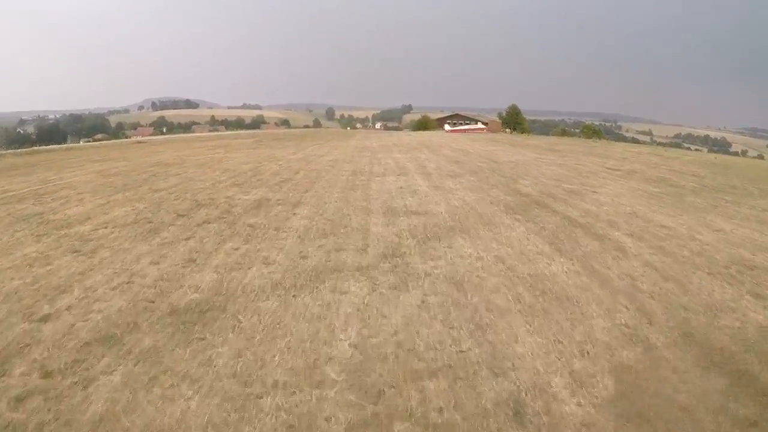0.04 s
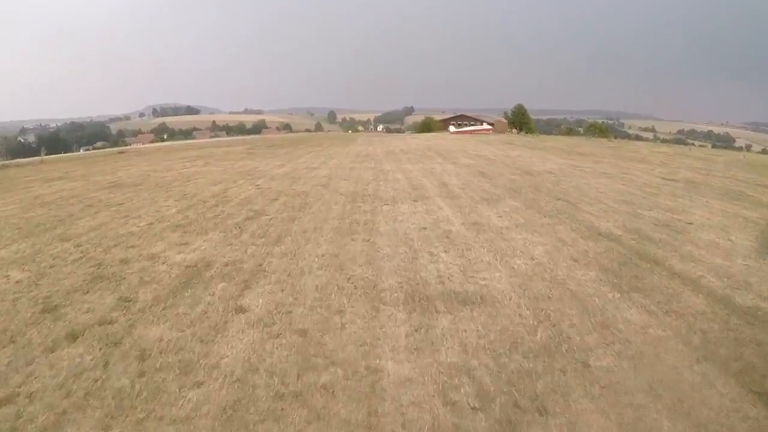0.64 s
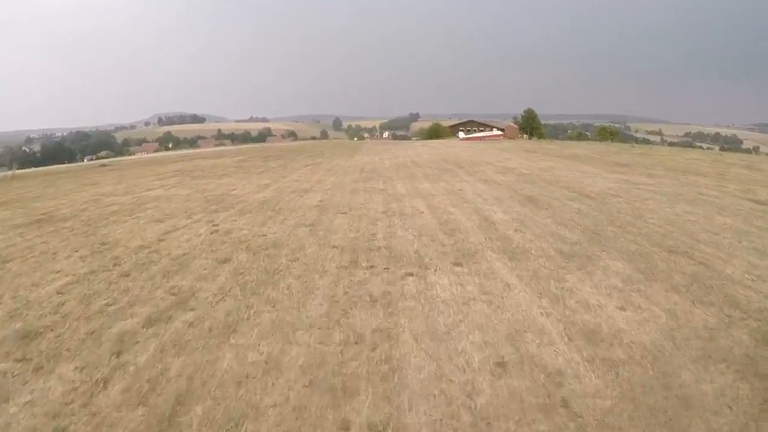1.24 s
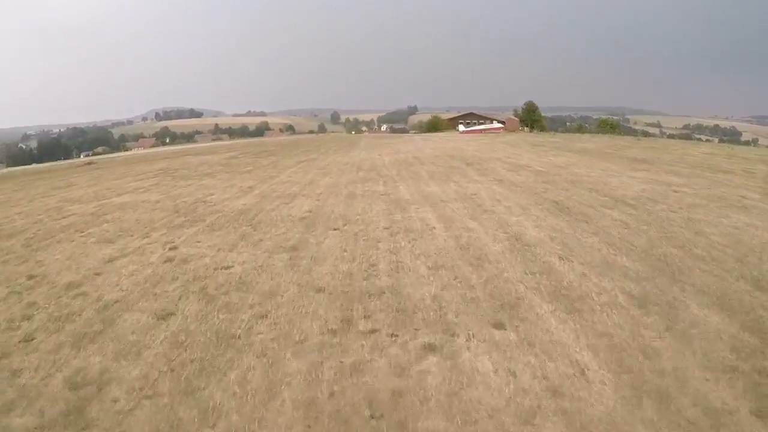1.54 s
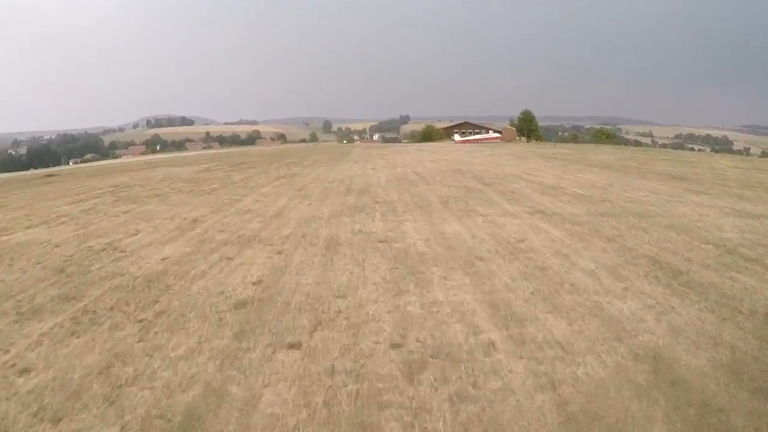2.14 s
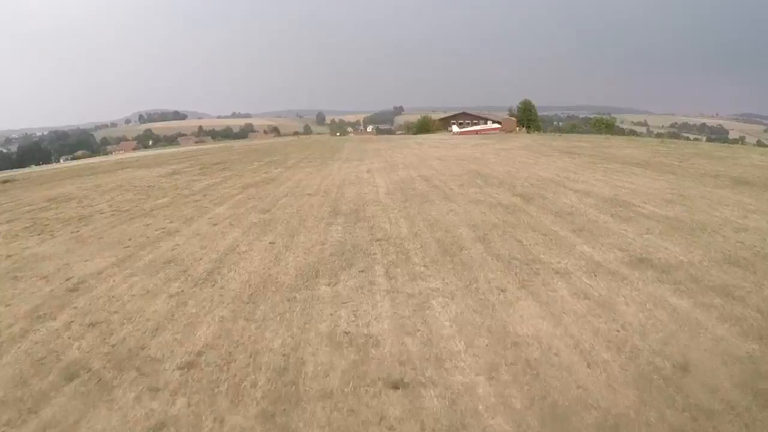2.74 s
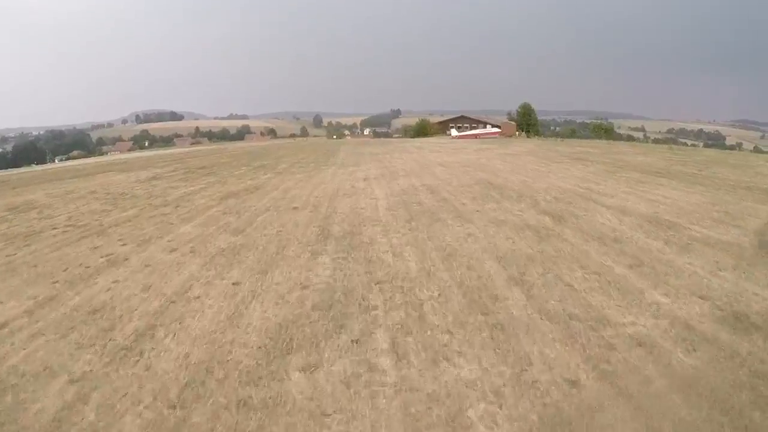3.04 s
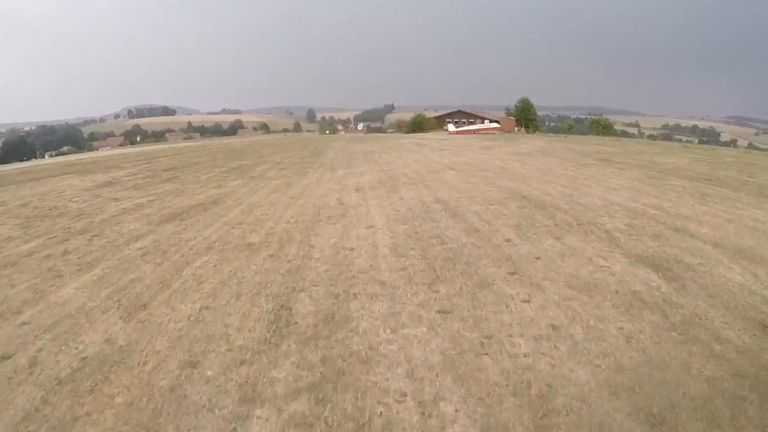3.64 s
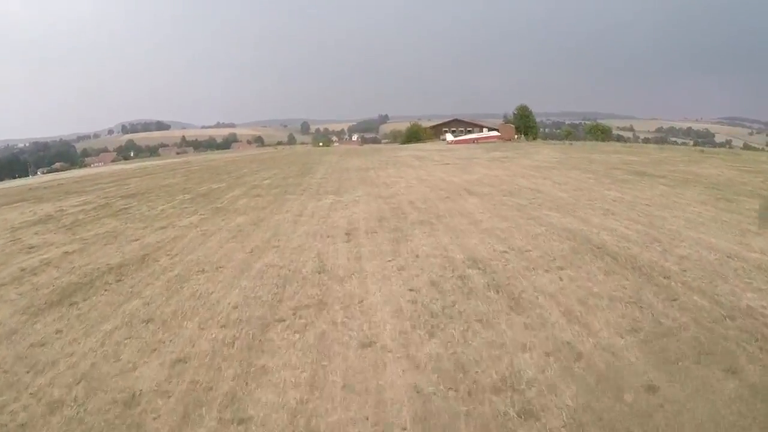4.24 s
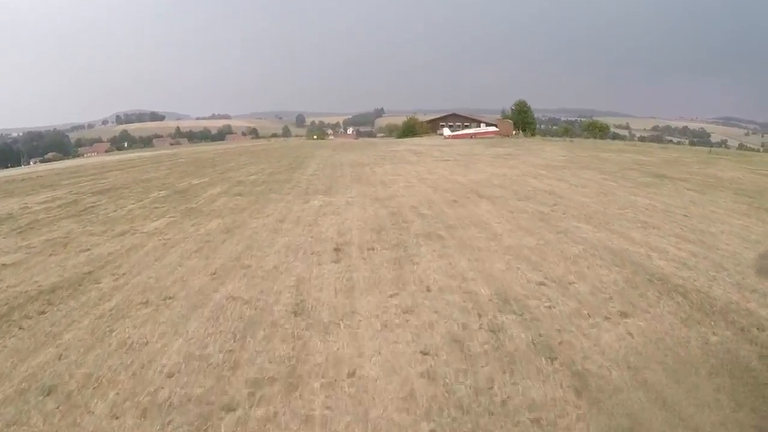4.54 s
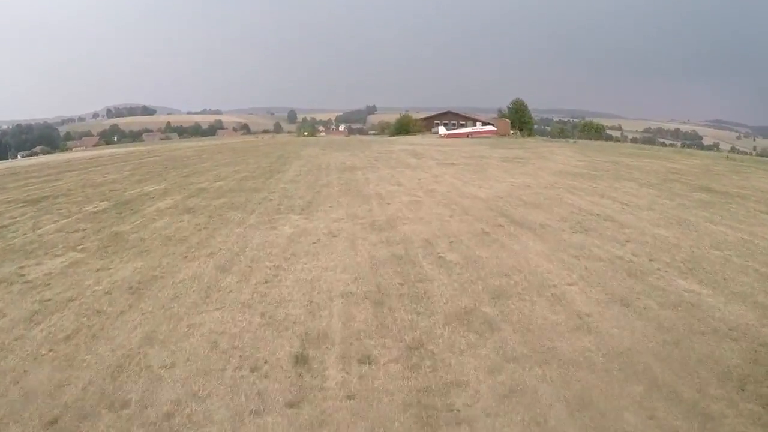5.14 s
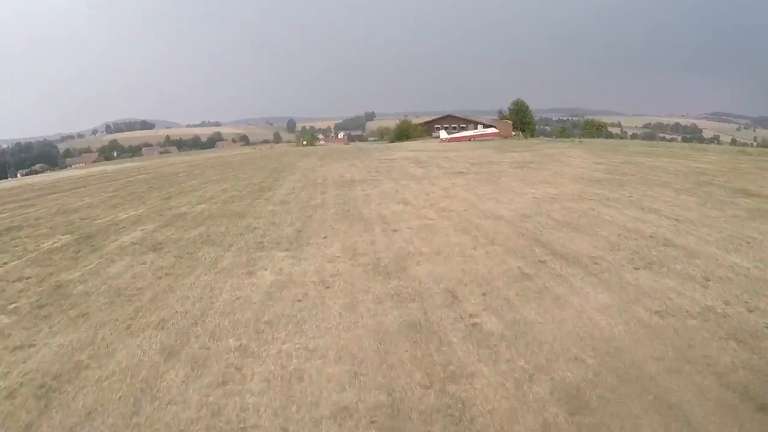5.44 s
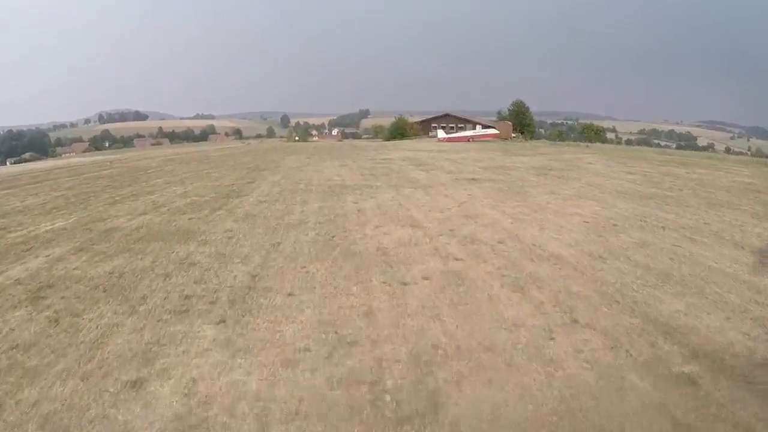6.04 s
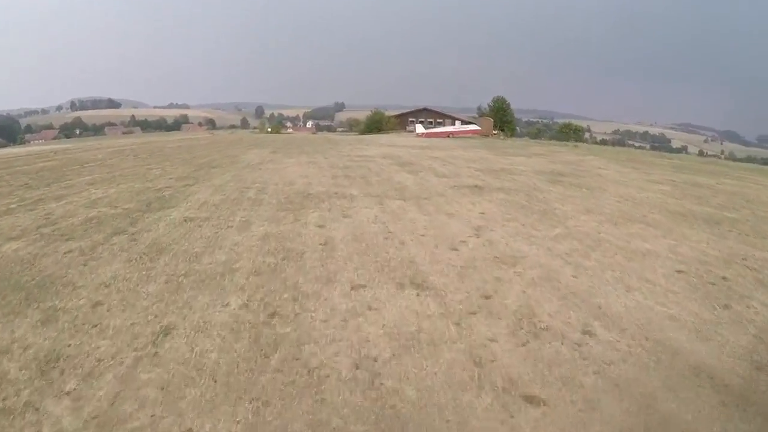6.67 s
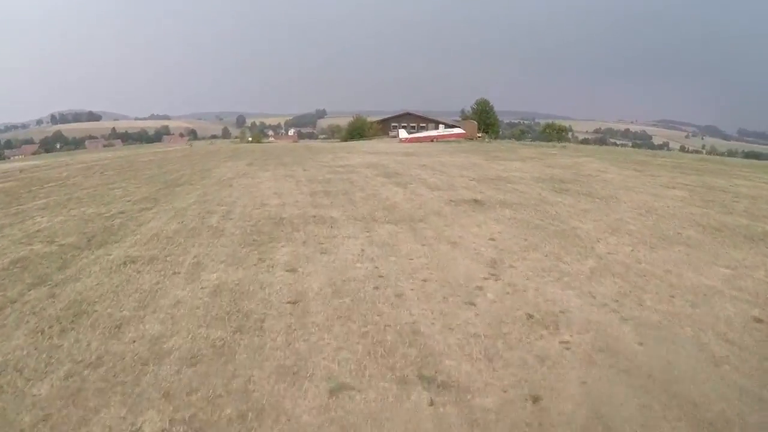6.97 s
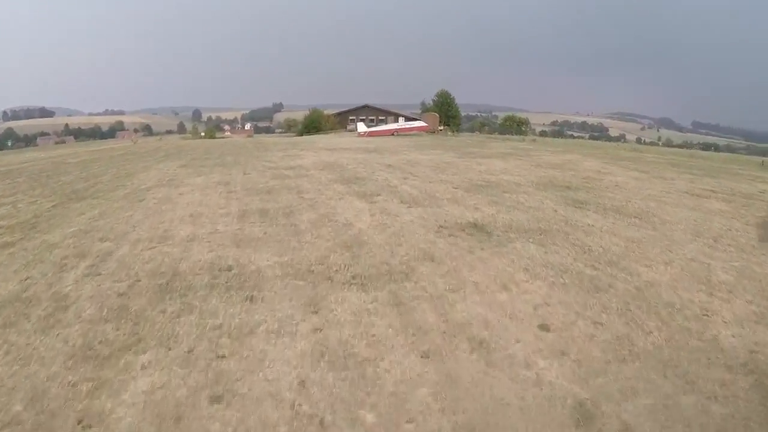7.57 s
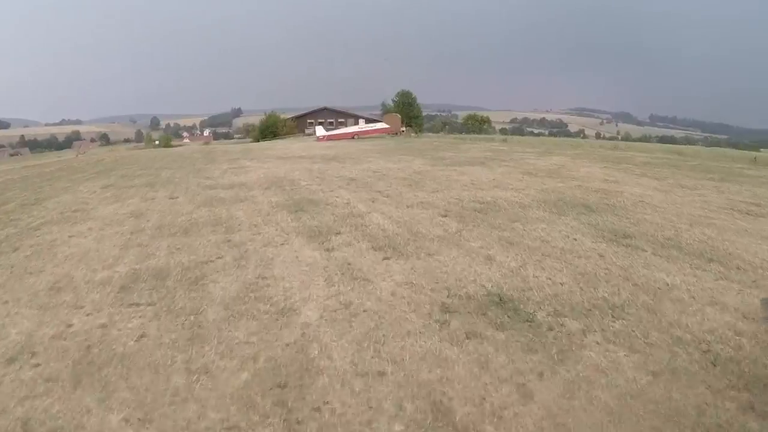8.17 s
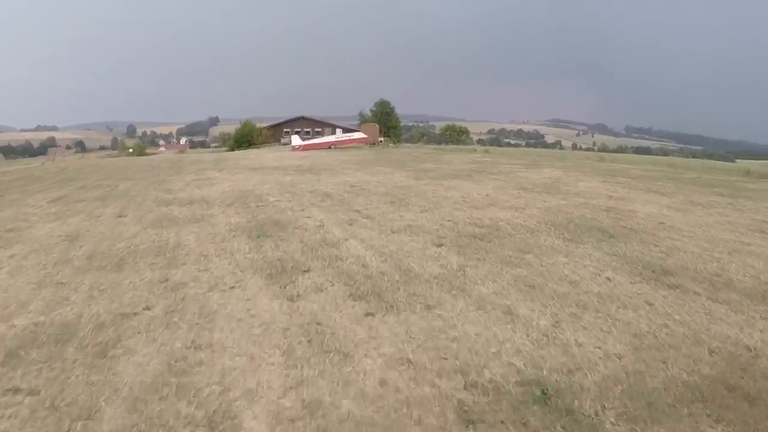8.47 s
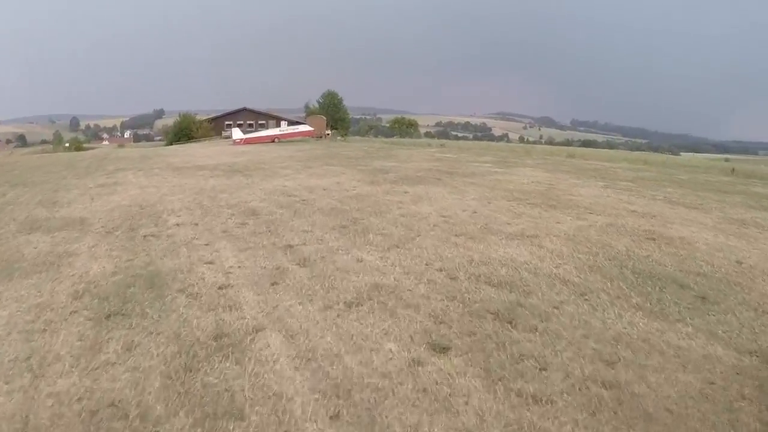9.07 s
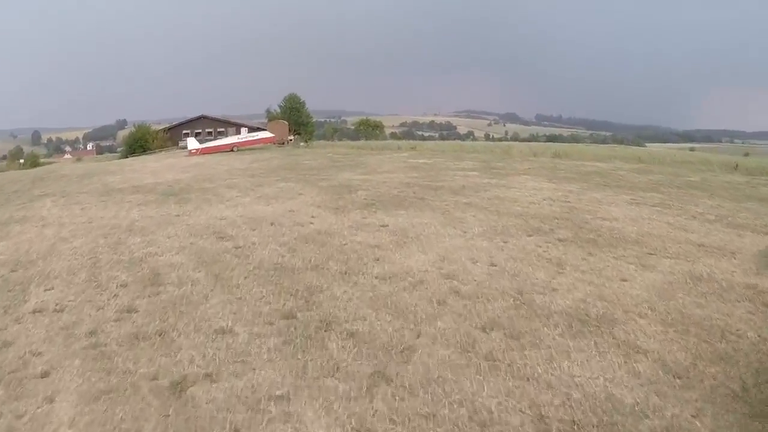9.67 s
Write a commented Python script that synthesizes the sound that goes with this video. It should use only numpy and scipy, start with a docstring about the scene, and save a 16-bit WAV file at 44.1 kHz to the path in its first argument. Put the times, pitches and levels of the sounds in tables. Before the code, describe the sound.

A light aircraft taxis over a bumpy grass strip, heard in the open air from a microphone mounted on its outside. From the start a deep, wavering rumble and boom of the airframe dominates. Beneath it the engine idles evenly with exhaust chuffs and fine, high valve ticks, and the tyres rustle through dry grass. A loose fitting knocks irregularly on the bumps, with short squeaks near 0.7 and 1.6 seconds, a cluster of knocks from 2 to 2.5 seconds and a sharp one near 3.5. The busiest run of knocking comes from 4.3 to 5.4 seconds, with one tiny bright tick of grit near 5.1. The rumble dips briefly around 6.7 seconds, with a faint squeak. A few more knocks follow after 8 seconds. Around 9 seconds the jolting is roughest and the fitting gives several squeaky chatters, while the rumble carries on until nearly 10 seconds.

```python
"""A light aircraft taxis on a bumpy grass strip; the microphone is in a small cased camera on its outside.
From the start the airframe sways and booms, the engine idles with exhaust chuffs and valve ticks, and
the tyres rustle through dry grass. Hard bumps set a loose fitting knocking, most of all near 2 s and
from 4.3 to 5.4 s, when a grain of grit also flicks the case. Around 9 s the ground is at its roughest,
and the fitting gives a few squeaky chatters."""
import sys
import numpy as np
from scipy import signal
from scipy.fft import rfft, irfft, next_fast_len
from scipy.io import wavfile
from scipy.ndimage import uniform_filter1d

SR = 44100
rng = np.random.default_rng(int(sys.argv[2]) if len(sys.argv) > 2 else 0)


def int16_out(signal):
    """Quantize to a 16-bit WAV file."""
    q = np.round(np.clip(np.atleast_2d(signal).T, -1, 1) * 32767)
    wavfile.write(sys.argv[1], SR, q.astype(np.int16))


N = 432621
TIME = np.arange(N) / SR


def airframe(jolt_db, drum_db):
    """Right under the microphone the frame sways; the ground jolts its other modes and drums its skin."""
    # pitch of the deep main sway: (time [s], frequency [Hz])
    sway_pitch = [(0.0, 39.5), (1.09, 40.5), (1.17, 39.5), (4.15, 38.5), (4.26, 39.5), (6.53, 38.0),
                  (6.72, 37), (6.88, 36), (7.02, 38.4), (8.8, 38.5), (8.91, 35.5), (9.26, 35.5),
                  (9.59, 41.5), (9.81, 41.0)]
    # strength of that sway: (time [s], level [dB])
    sway_levels = [(0.0, -9.5), (0.05, -12), (0.38, -11.5), (0.46, -17.5), (0.52, -13), (0.9, -10.5),
                   (1.17, -18), (1.2, -20), (1.26, -13), (1.66, -10.5), (1.94, -18), (2.05, -11.5),
                   (2.37, -10), (2.7, -22), (2.76, -13), (2.92, -11), (3.72, -12.5), (3.79, -9),
                   (3.85, -15), (4.1, -11.5), (4.18, -16), (4.23, -23.5), (4.32, -11.5), (4.48, -14),
                   (4.51, -19), (4.7, -10.5), (4.94, -14.5), (4.97, -10), (5.27, -14), (5.32, -9),
                   (5.54, -21.5), (5.57, -12), (5.68, -9.5), (5.82, -17), (6.31, -8), (6.39, -19.5),
                   (6.45, -10), (6.5, -8.5), (6.61, -13.5), (6.69, -27.5), (6.8, -25), (6.83, -15),
                   (6.97, -13.5), (7.02, -20.5), (7.16, -9.5), (7.38, -11), (7.49, -18.5), (7.65, -13),
                   (7.73, -36), (7.81, -10.5), (7.9, -19.5), (7.95, -12.5), (8.22, -16.5), (8.3, -11),
                   (8.36, -18), (8.5, -12.5), (8.58, -17.5), (8.72, -10), (8.88, -12), (8.93, -20),
                   (9.23, -9), (9.32, -27), (9.37, -12), (9.62, -12), (9.7, -16.5), (9.78, -8), (9.81, -12)]
    # frame modes shaken by the ground: (frequency [Hz], width [Hz], relative level [dB])
    frame_modes = [(14.57, 2.2, -1), (26, 7.1, -1.5), (55.15, 3.2, 1), (66.4, 16.5, -2), (87.9, 7.4, 1),
                   (112.6, 9.7, -6), (138.5, 25, -11), (171.4, 25, -13)]
    # modes of the skin panels: (frequency [Hz], width [Hz], relative level [dB])
    skin_modes = [(195.3, 28, -7), (219.6, 21.3, 0.5), (249.3, 9.3, -11.5), (271.6, 23, -16.5)]
    sway_hz, sway_db = in_time(sway_pitch)[0], in_time(sway_levels)[0]
    phase = 2 * np.pi * np.cumsum(sway_hz) / SR
    sway = from_db(sway_db + 0.45 * drift(per_s=12)) * np.sqrt(2) * np.sin(phase)
    boom = from_db(jolt_db + 6.5) * shaken(frame_modes, even_s=.2)
    drum = from_db(drum_db - 0.04) * shaken(skin_modes, even_s=0.17)
    return sway + boom + drum


def engine():
    """Close by, a four-stroke idles: exhaust chuffs and valve ticks come round every two crank turns."""
    # crankshaft speed: (time [s], speed [turns/s])
    crank_speed = [(0.0, 23.26), (1.2, 23.08), (2.4, 23.24), (3.5, 23.12), (4.5, 23.4), (6.0, 23.29),
                   (7.2, 23.43), (8.3, 23.54), (9.8, 23.26)]
    # engine at the microphone: (time [s], relative exhaust level [dB], relative valve level [dB])
    engine_levels = [(0.05, -31, -50.5), (0.07, -43, -57.5), (1.4, -39, -55.5), (2.62, -45, -60),
                     (2.84, -44, -59.5), (3.98, -44.5, -59), (4.68, -40.5, -56), (4.87, -37, -55),
                     (5.25, -38.5, -56.5), (5.6, -42, -59), (6.31, -43.5, -57.5), (6.47, -49.5, -60),
                     (6.74, -47.5, -62.5), (6.99, -43, -61), (7.2, -46.5, -60), (7.72, -45, -60.5),
                     (8.42, -41, -52), (9.29, -34, -53), (9.78, -37.5, -55.5)]
    # exhaust chuffs, valve ticks, spits of hiss: (place [cycles], half-width [cycles], strength [gain])
    chuff_bursts = [(.76, .08, 1), (.23, .055, .7)]
    tick_bursts = [(.07, .04, .6), (.565, .028, 1), (.63, .05, .42)]
    spit_bursts = [(.095, .075, 1), (.58, .04, .3)]
    # their spectra before the case colours them: (frequency [Hz], relative level [dB])
    exhaust_spectrum = [(200, -26), (380, 2), (700, -8), (1150, 3.5), (1500, -8.5), (2000, -3), (2800, -17),
                        (4300, -16), (6000, -23), (15000, -39)]
    click_spectrum = [(3000, -34), (8800, -9), (10400, -17), (11000, 1.5), (11800, 3), (12600, -20),
                      (15000, -34)]
    hiss_spectrum = [(3000, -32), (8500, -25), (10200, -4), (11700, 0), (12700, -3), (14000, -1),
                     (15300, -14)]
    cycles = np.cumsum(in_time(crank_speed)[0]) / SR / 2
    exhaust_db, valve_db = in_time(engine_levels)
    chuffs = .45 + bursts(cycles, chuff_bursts, uneven_db=2.5)
    exhaust = through_case(chuffs * rng.standard_normal(N), exhaust_spectrum)
    ticks = .16 + bursts(cycles, tick_bursts, uneven_db=1.8)
    click = through_case(ticks * rng.standard_normal(N), click_spectrum)
    ping = rms_one(resonate(ticks ** 2 * rng.standard_normal(N), hz=11320, width=450))  # hard ticks ring
    spits = .22 + bursts(cycles, spit_bursts, uneven_db=2.5)
    hiss = through_case(spits * rng.standard_normal(N), hiss_spectrum)
    valves = from_db(-2.5) * click + from_db(-10) * ping + from_db(-5) * hiss
    return from_db(exhaust_db + 0.5) * exhaust + from_db(valve_db) * valves


def loose_fitting():
    """Single knocks on the hard bumps, and stick-slip chatters that die away as the part settles."""
    # knocks: (time [s], relative peak [dB], thud [dB], crack [dB]); the last two against the middle band
    knocks = [(0.452, -28, -17, -20), (0.662, -28, -18, -24), (0.69, -17.5, -8.5, -27),
              (0.953, -24, -5, -9), (1.154, -25, -23, -24), (1.643, -21, -5, -24), (1.956, -27, -8, -29),
              (2.026, -18.5, -7, -27), (2.055, -13, -6.5, -18), (2.099, -15, -6, -17.5),
              (2.135, -10.5, -0.5, -12.5), (2.174, -20, -7, -23), (2.456, -21, -6.5, -26),
              (2.482, -18.5, -4.5, -25), (2.528, -22, -7, -26), (3.339, -24, -1.5, -24.5),
              (3.38, -25, -1, -26), (3.421, -23, -2, -14), (3.461, -9.5, -6.5, -17),
              (3.506, -28, -9, -26.5), (4.287, -24.5, -7, -20), (4.321, -11, -7, -25),
              (4.398, -10.5, -6.5, -23), (4.719, -20, -6, -21), (4.758, -13.5, -8, -23),
              (4.8, -18.5, -5, -24), (4.833, -12, -1, -19.5), (4.938, -17, -10, -20),
              (4.969, -11.5, -4.5, -21), (5.016, -19.5, -20, -27), (5.074, -14.5, -7, -19),
              (5.142, -14.5, -10, -25), (5.168, -14.5, -8, -21), (5.214, -18.5, -8, -27),
              (5.286, -21, -10, -26), (5.321, -18.5, -4, -31), (5.365, -23.5, -6, -24),
              (5.396, -22, -3, -25), (5.665, -27.5, -11, -18), (6.044, -25.5, -1.5, -13),
              (6.3, -27.5, -15, -22), (6.39, -26, -11, -21), (6.449, -27, -6, -23), (8.06, -23, -8, -25.5),
              (8.079, -20, -11, -21), (8.307, -18.5, -10.5, -23), (9.556, -18.5, -20, -28.5),
              (9.794, -20, 2.5, -17)]
    # squeaky chatters: (time [s], decay [s], level [dB], centre [Hz], width [octaves])
    chatters = [(0.701, 0.11, -39, 1090, 1.3), (1.619, .08, -37, 2300, 0.62), (1.635, .045, -23, 1100, .3),
                (1.683, 0.014, -25.5, 2020, 0.3), (6.769, 0.018, -33, 1960, 0.29),
                (6.784, .09, -37, 1100, 2.14), (6.81, 0.019, -33, 2230, 0.58),
                (8.328, 0.014, -30, 1950, 0.24), (9.124, 0.027, -34, 2600, 0.34),
                (9.139, 0.015, -23, 1970, 0.21), (9.169, .016, -30, 1490, .4), (9.295, .05, -34, 590, 0.47),
                (9.399, 0.01, -25.5, 2100, 0.36)]
    out = np.zeros(N)
    for s, peak_db, thud_db, crack_db in knocks:
        add(out, s - .0016, knock(peak_db, thud_db, crack_db))  # contact begins just ahead of the impact
    t = TIME[:SR // 3]
    for s, decay_s, db, hz, octaves in chatters:
        slips = sparse_clicks(len(t), per_s=1800)
        squeak = rms_one(band(slips, hz * 2 ** (-octaves / 2), hz * 2 ** (octaves / 2), order=3))
        envelope = np.minimum(t / 0.0017, 1) * np.exp(-(t / decay_s) ** 2)
        add(out, s, from_db(db) * envelope * squeak)
    return out


def knock(peak_db, thud_db, crack_db, contact_s=.0014, rebound_s=.008, rattle_s=0.064):
    """An impact with rough contact, a softer rebound and a dying rattle all ring the fitting's modes."""
    # modes of the fitting: (frequency [Hz], width [Hz], relative level [dB])
    modes = [(397, 61, 1), (544, 94, -1), (683, 38, -1), (763, 51, -1), (886, 44, 2), (990, 25, 2),
             (1128, 75, 2), (1250, 84, -0.5), (1340, 89, 0.5), (1487, 27, -13), (1760, 46, -16),
             (1930, 145, -4), (2110, 89, -9), (2500, 120, -21), (2900, 140, -9), (3300, 110, -23),
             (3600, 160, -21.5), (4230, 190, -29)]
    t = TIME[:SR // 6]
    contact = t / contact_s * np.exp(1 - t / contact_s)
    rebound = from_db(-10) * np.exp(-(2 * (t - rebound_s) / rebound_s) ** 2)
    touches = rms_one(sparse_clicks(len(t), per_s=400))
    # light touches excite mostly the middle modes
    rattle = from_db(-16) * np.exp(-t / rattle_s) * band(touches, 450, 2600, order=1)
    force = (contact + rebound) * rng.standard_normal(len(t)) + rattle
    add(force, contact_s, from_db(8) * np.ones(5))  # the impact itself
    ring = sum((-1) ** k * from_db(db) * resonate(force, hz, width)
               for k, (hz, width, db) in enumerate(modes))
    thud = rms_one(band(ring, 283, 735))
    middle = rms_one(band(ring, 810, 2130))
    crack = rms_one(band(ring, 2730, 4200, order=3))
    blow = middle + from_db(thud_db + 1) * thud + from_db(crack_db - 0.5) * crack
    return from_db(peak_db + 1.94) * blow / np.max(np.abs(middle))


def tyres(rustle_db):
    """Down at the wheels, dry stalks crush tuft by tuft."""
    # spectrum of crushed grass: (frequency [Hz], relative level [dB])
    grass_spectrum = [(200, 0), (400, -1), (900, 2.5), (1300, -2), (2100, 1.5), (3000, -12.5),
                      (4400, -11.5), (5500, -21.5), (7200, -19), (8800, -31.5), (11400, -17.5),
                      (13000, -46), (15000, -37)]
    crush = grains(per_s=2500, spread_db=2.5) + 0.9 * rng.standard_normal(N)
    tufts = from_db(1.5 * drift(per_s=35))
    return from_db(rustle_db + 8) * through_case(crush * tufts, grass_spectrum)


def grit():
    """A grain of grit hits the case, right at the microphone: one tiny bright tick."""
    # hits on the case: (time [s], level before filtering [dB])
    hits = [(5.134, -16)]
    clicks = np.zeros(N)
    for s, db in hits:
        add(clicks, s, from_db([db]))
    return band(clicks + 1e-18, 3000, 15000, order=1)


def shaken(modes, even_s):
    """Modes kept ringing by random jolts, their level evened over even_s; rms about 1."""
    ring = 0
    for hz, width, db in modes:
        stage_width = 1.49 * width  # two stages in series narrow the peak again
        jolts = resonate(rng.standard_normal(N), hz, stage_width)
        ring = ring + from_db(db) * rms_one(resonate(jolts, hz, stage_width))
    return ring / np.sqrt(uniform_filter1d(ring ** 2, int(even_s * SR) + 1) + 1e-9)


def bursts(cycles, table, uneven_db):
    """Bell-shaped bursts that come round in every engine cycle, each time with another strength."""
    out = 0
    for place, half_width, strength in table:
        position = cycles - place + 3 / 2  # each burst peaks midway between whole numbers
        chance = from_db(uneven_db * rng.standard_normal(256))[position.astype(int)]
        bell = np.exp(-.5 * ((position % 1 - .5) / half_width) ** 2)
        out = out + strength * chance * bell
    return out


def through_case(x, spectrum):
    """Give x a smooth spectrum and the resonances of the case around the microphone; rms 1."""
    # peaks and dips of the camera case and its bracket: (frequency [Hz], width [Hz], lift [dB])
    resonances = [(327, 30, -5), (412, 21, 3.5), (649, 12, -11), (695, 62, 7), (834, 62, -4.5),
                  (1075, 55, 4.5), (1200, 49.5, 13), (1650, 110, -6), (1890, 43, 2.5), (2397, 74, -10),
                  (2480, 92, 6.5), (2940, 220, 6.5), (3380, 163, -11.5), (3520, 100, 7.5), (4187, 60, 9)]
    size = next_fast_len(N)
    f = np.fft.rfftfreq(size, 1 / SR) + 1
    points, levels = np.transpose(spectrum)
    source_db = np.interp(np.log(f), np.log(points), levels)
    case_db = sum(lift / (1 + (2 * (f - hz) / width) ** 2) for hz, width, lift in resonances)
    return rms_one(irfft(rfft(x, size) * from_db(source_db + case_db), size)[:N])


def grains(per_s, spread_db):
    """Random clicks, a few much louder than the rest; rms 1."""
    sizes = from_db(spread_db * np.minimum(rng.exponential(1, N), 4)) * rng.choice([-1, 1], N)
    return rms_one(sizes * (rng.random(N) < per_s / SR))


def sparse_clicks(samples, per_s):
    """Noise thinned to scattered clicks."""
    return rng.standard_normal(samples) * (rng.random(samples) < per_s / SR)


def resonate(x, hz, width):
    """One resonance with a gain of 1 at its peak."""
    r = np.exp(-np.pi * width / SR)
    feedforward = np.array([1, 0, -1]) * (1 - r * r) / 2
    feedback = [1, -2 * r * np.cos(2 * np.pi * hz / SR), r * r]
    return signal.lfilter(feedforward, feedback, x + 1e-18)


def band(x, low_hz, high_hz, order=2):
    """Causal band-pass."""
    return signal.sosfilt(signal.butter(order, [low_hz, high_hz], "band", fs=SR, output="sos"), x)


def drift(per_s):
    """A slow random wander with a spread of about 1."""
    knots = rng.standard_normal(4096)
    return np.interp(TIME * per_s, np.arange(len(knots)), knots)


def in_time(rows):
    """One curve for each column after the time column."""
    s, *columns = np.transpose(rows)
    return [np.interp(TIME, s, c) for c in columns]


def add(out, s, sound):
    """Mix a sound in at time s."""
    start = max(round(s * SR), 0)
    out[start:start + len(sound)] += sound[:max(N - start, 0)]


def from_db(db):
    """Decibels to gain."""
    return 10 ** (np.asarray(db) / 20)


def rms_one(x):
    """Scale to an rms of 1."""
    return x / np.sqrt(np.mean(x ** 2) + 1e-20)


def scene():
    """Open air, mono, no room: everything reaches the camera's microphone through its bracket."""
    # ground under the wheels, in relative levels: (time [s], jolts [dB], skin drumming [dB], rustle [dB])
    ground = [(0.04, -35, -29.5, -51), (0.12, -32.5, -37.5, -46.5), (0.5, -35.5, -33.5, -51),
              (0.58, -28, -35, -49), (0.69, -32, -32.5, -46.5), (1.1, -36, -35.5, -47.5),
              (1.15, -29.5, -34, -51), (1.61, -32, -29.5, -43.5), (1.69, -35.5, -32, -50),
              (2.02, -33.5, -34, -49.5), (2.48, -37.5, -36.5, -50.5), (3.0, -31.5, -38.5, -50),
              (3.13, -35, -38, -50), (4.16, -36, -36.5, -51), (4.38, -30, -28, -45),
              (4.46, -30.5, -35.5, -48.5), (4.79, -30, -29.5, -44), (5.35, -33.5, -34, -53.5),
              (5.57, -32.5, -31.5, -46.5), (5.87, -34.5, -36, -51.5), (6.06, -31.5, -30, -47),
              (6.14, -31.5, -44, -45.5), (6.47, -36.5, -34.5, -48), (6.52, -40.5, -43, -51),
              (6.77, -40, -39.5, -55), (6.85, -32.5, -33, -49.5), (7.12, -37.5, -38, -49.5),
              (7.63, -37.5, -40.5, -51), (7.82, -31.5, -34, -49), (8.58, -25.5, -32.5, -42.5),
              (8.69, -29, -27, -44), (8.8, -26, -38, -43), (8.91, -33.5, -29, -46),
              (9.02, -24.5, -29.5, -41.5), (9.45, -31.5, -28.5, -54), (9.7, -32, -35, -46),
              (9.78, -32, -29, -48)]
    jolt_db, drum_db, rustle_db = in_time(ground)
    return (engine() + airframe(jolt_db, drum_db) + tyres(rustle_db) + loose_fitting() + grit())[None]


def record(dry, cutoff_hz=15400):
    """The highest treble is cut steeply."""
    return signal.sosfilt(signal.ellip(10, .2, 90, cutoff_hz, fs=SR, output="sos"), dry)


dry = scene()
out = record(dry)
int16_out(out)
```